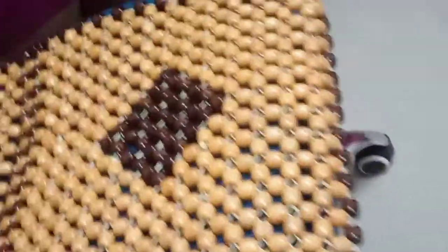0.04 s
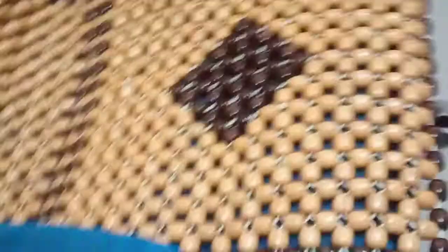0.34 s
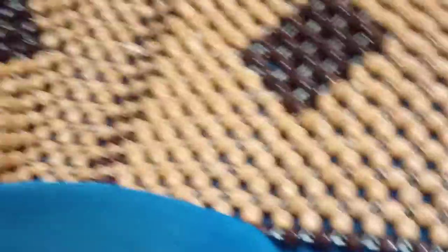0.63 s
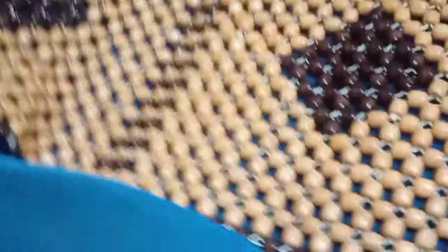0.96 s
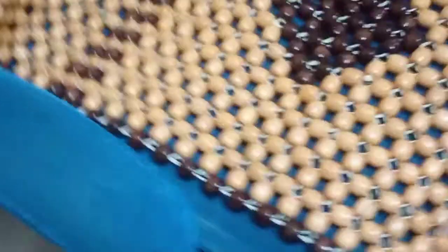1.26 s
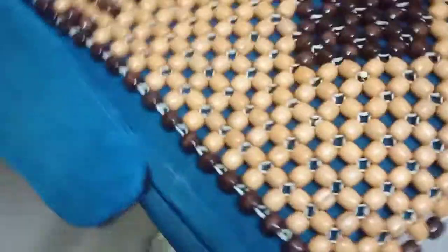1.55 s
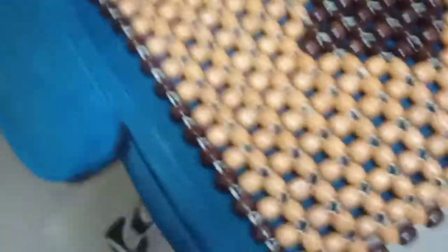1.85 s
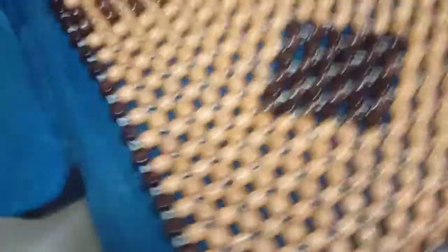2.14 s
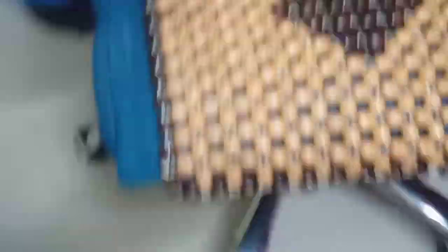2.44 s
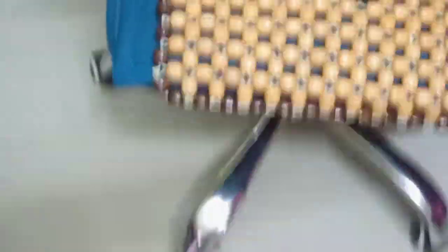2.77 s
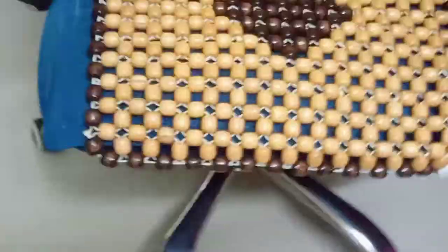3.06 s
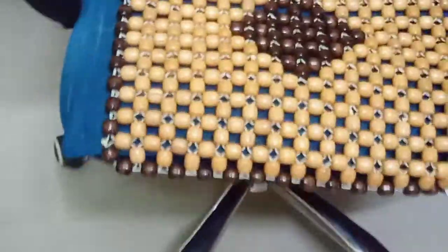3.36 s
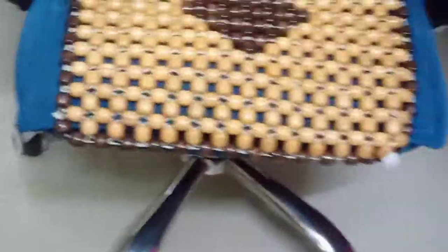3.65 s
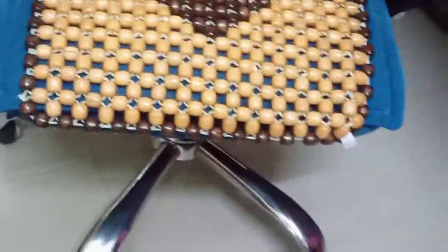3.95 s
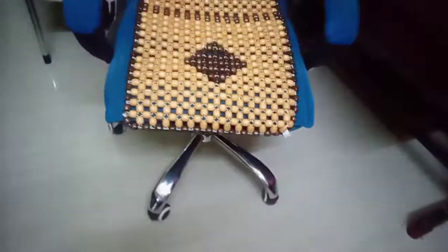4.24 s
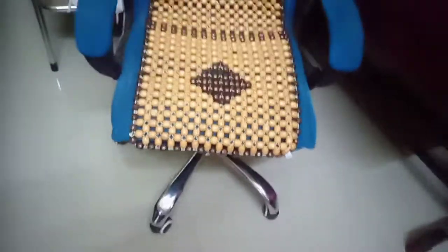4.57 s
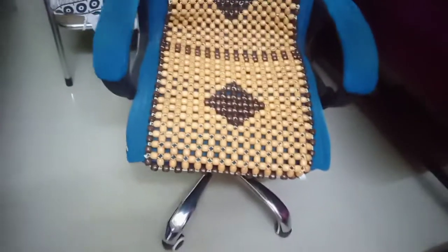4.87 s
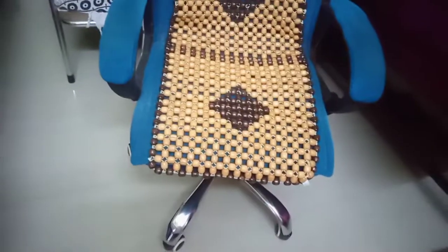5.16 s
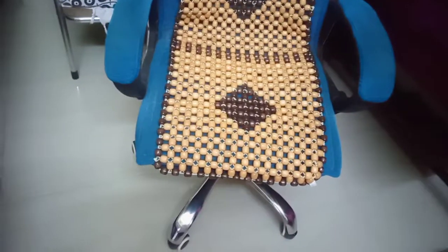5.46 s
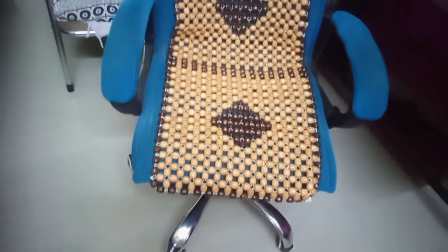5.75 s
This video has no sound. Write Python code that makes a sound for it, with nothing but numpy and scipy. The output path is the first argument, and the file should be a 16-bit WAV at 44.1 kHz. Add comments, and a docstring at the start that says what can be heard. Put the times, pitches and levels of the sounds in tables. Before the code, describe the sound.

A small camera is carried by hand around an office chair in a quiet room. Fingers drag and slide on its casing in short rustling strokes, with dull hollow knocks and a few faint bright ticks. The handling grows busier and louder toward the middle, then thins to occasional soft bumps. Everything is dry and right at the microphone, over a low rumble and steady hiss.

```python
"""A quiet room, where a small phone is carried by hand round an office chair with a wooden bead cover. The bed
is room hiss and the low rumble of the unsteady hand. Up close, fingers drag and slide on the casing in short
rustling strokes, the skin sticking and slipping. The grip knocks dully against the hollow shell, and now and
then a finger catches with a light, bright tick."""
import sys
import numpy as np
from scipy import signal
from scipy.fft import rfft, irfft
from scipy.io import wavfile
from scipy.ndimage import uniform_filter1d

SR = 44100
rng = np.random.default_rng(int(sys.argv[2]) if len(sys.argv) > 2 else 0)


def generate_wav(signal):
    """Clip the signal to [-1, 1] and save it as 16-bit WAV at the path in sys.argv[1]."""
    frames = np.transpose(np.atleast_2d(signal))
    scaled = np.clip(frames, -1, 1) * 32767
    pcm = np.round(scaled).astype(np.int16)
    wavfile.write(sys.argv[1], SR, pcm)


N = 256220
TIME = np.arange(N) / SR

# tone of the room's hiss: (frequency [Hz], relative level [dB])
HISS_EQ = [(40, 20.5), (250, 16), (500, 8), (1000, 5), (2000, 0), (3300, -0.5), (4000, -4.5), (4800, -11.5),
           (7000, -13), (10300, -14), (12000, -16.5), (16000, -16.5)]
# tone of the dark opening rush: (frequency [Hz], relative level [dB])
RUSH_EQ = [(40, -14), (100, 6.5), (240, 5), (420, -8), (850, -9), (1400, -14), (2200, -24.5), (3500, -36),
           (5000, -58), (16000, -64)]
# tone of the hand's tremor: (frequency [Hz], relative level [dB])
RUMBLE_EQ = [(20, -34.5), (35, -15), (52, -2.5), (76, 2), (108, -4), (150, -7.5), (220, -20.5), (400, -37),
             (800, -47), (2000, -75), (16000, -130)]
# unrest of the hand between shifts of the grip: (time [s], level [dB])
RUMBLE_FADER = [(0.0, -52.5), (0.32, -45.5), (0.53, -30.5), (0.68, -40), (1.63, -41.5), (1.84, -35.5),
                (2.22, -32), (2.36, -34), (2.85, -35.5), (2.99, -39), (3.77, -41.5), (4.04, -44.5),
                (4.37, -42.5), (4.81, -45.5), (4.97, -44.5), (5.81, -49.5)]
# finger strokes: (crest time [s], length [s], dull drag [dB], bright slide [dB], firmness [0-1])
STROKE_CUES = [(0.159, 0.044, -46, -71, 0.3), (0.373, 0.074, -44.5, -62, 0.47),
               (.411, 0.057, -39, -53, 0.95), (.437, 0.031, -31.5, -55, 1), (0.51, .04, -45.5, -62.5, 0.53),
               (0.582, 0.087, -34, -64.5, 0.66), (0.65, 0.058, -34.5, -67, .3),
               (.747, 0.03, -35.5, -85, 0.4), (0.892, 0.081, -46.5, -78, 0),
               (.983, 0.031, -38.5, -73, 0.58), (1.114, 0.041, -31.5, -63, 0.4),
               (1.19, 0.038, -48.5, -64, 0.36), (1.35, 0.052, -52, -67, 0.44), (1.584, 0.074, -49, -67, 0),
               (1.723, 0.046, -52, -54, .33), (1.795, 0.063, -34.5, -47.5, 0.73),
               (1.838, 0.053, -44.5, -53, 0.4), (1.917, 0.066, -37, -54.5, 0.4),
               (2.058, 0.087, -37, -53, 0.37), (2.129, 0.034, -45, -54, 0.2),
               (2.186, 0.11, -39.5, -51, 0.47), (2.28, 0.13, -34.5, -48.5, 0.42),
               (2.361, 0.038, -30.5, -51, 0.5), (2.403, 0.07, -27, -47.5, 0.58),
               (2.478, 0.089, -45, -63, 0.46), (2.519, 0.049, -31, -57, 0.57),
               (2.617, 0.068, -23, -54, .56), (2.672, .07, -37.5, -63.5, 0.15),
               (2.767, 0.054, -31.5, -65.5, .27), (2.85, 0.027, -44.5, -74, .05),
               (2.947, .037, -23.5, -74, 0.75), (2.973, 0.037, -39.5, -80, 0.4),
               (3.922, 0.052, -47, -76, .3), (4.223, 0.078, -43, -76, 0.3), (4.332, 0.067, -43.5, -83, .55),
               (4.456, 0.088, -43, -85, 0.5), (4.557, 0.032, -43.5, -86, 0.62),
               (5.134, 0.086, -51.5, -80, .47)]
# dull creep of a light finger: (frequency [Hz], relative level [dB])
CREEP_EQ = [(40, -14), (90, -27.5), (140, 6), (205, -1.5), (310, -5.5), (430, -10.5), (640, -18),
            (900, -21), (1300, -40), (3300, -48), (16000, -83)]
# dull drag of a firm finger: (frequency [Hz], relative level [dB])
DRAG_EQ = [(40, -27), (90, -11), (190, 3.5), (320, -8.5), (470, -14.5), (640, -16), (800, -22), (1000, -25),
           (1200, -25), (2000, -33), (3300, -37), (4800, -51), (9500, -51.5), (16000, -71)]
# light sizzle of gliding skin: (frequency [Hz], relative level [dB])
SIZZLE_EQ = [(500, -8), (900, 6.5), (1300, -6), (2400, -10), (3350, 1), (4100, -7.5), (5000, -23.5),
             (6500, -24), (8800, -16.5), (9700, 1), (10500, 0.5), (11500, -9.5), (12800, -14), (16000, -20)]
# broad scrape of skin under pressure: (frequency [Hz], relative level [dB])
SCRAPE_EQ = [(500, -9), (760, 14.5), (980, 18), (1250, -11.5), (2400, -11), (3400, 6.5), (4900, -7),
             (6400, 1.5), (7600, 4.5), (10300, 2.5), (12000, -16), (16000, -27)]
# knocks of the grip: (time [s], thud level [dB], thud pitch [Hz], tap level [dB], tap low-pass [Hz])
KNOCK_CUES = [(0.338, -25, 101, -31, 357), (.4, -19, 104.5, -33, 497), (.514, -28.5, 140, -11.5, 560),
              (1.012, -25, 75, -35, 300), (1.102, -26.5, 121, -34, 700), (1.112, -29, 129, -19, 710),
              (1.127, -29, 110, -27.5, 396), (1.206, -43, 110, -34, 1490), (1.55, -34, 87, -38, 1170),
              (1.606, -27, 97, -22.5, 1010), (1.706, -21, 95, -55, 300), (1.771, -20.5, 94, -20.5, 1050),
              (1.795, -17, 88, -21, 1010), (1.895, -13, 88, -16.5, 950), (2.01, -24, 101, -39, 1500),
              (2.029, -15.5, 101, -20.5, 1120), (2.037, -36, 97, -17.5, 1060), (2.065, -17, 126, -45, 400),
              (2.149, -23.5, 109, -30, 910), (2.281, -16.5, 119, -39, 630), (2.312, -18.5, 122, -28, 410),
              (2.357, -12.5, 144, -15.5, 600), (2.385, -10, 104.6, -14, 450), (2.529, -22, 105, -28, 400),
              (2.596, -5.5, 105.6, -22, 700), (2.612, -7.5, 123, -35, 700), (2.624, -4, 120, -10, 624),
              (2.71, -21.5, 105, -30, 380), (2.754, -19, 110, -20.5, 610), (2.784, -22.5, 77, -24, 443),
              (2.887, -13.5, 112.4, -28, 610), (2.938, -26.5, 129, -12.5, 540),
              (3.049, -17.5, 79.5, -61, 400), (3.233, -17, 106, -28.5, 358), (3.313, -27.5, 84, -41, 400),
              (3.397, -19, 88, -34.5, 420), (3.484, -24.5, 114, -35, 450), (3.91, -27.5, 103, -45, 500),
              (4.025, -24, 87, -34.5, 665), (4.221, -34, 97, -38, 905), (4.495, -25.5, 74.4, -48, 400),
              (4.549, -41, 99, -39.5, 700), (4.643, -28, 84, -54, 400), (5.105, -30, 119, -51, 400),
              (5.562, -32, 86, -58, 400)]
# ring of the tapped casing: (frequency [Hz], relative level [dB], 60 dB decay time [s])
CASING_MODES = [(177, 7.5, 0.017), (380, -4.5, 0.0078), (823, -12, 0.018), (993, -42, 0.013)]
# catches of a finger: (time [s], level [dB])
TICK_CUES = [(.3687, -62), (1.002, -56.5), (1.2044, -53.5), (1.567, -57), (1.5853, -52.5), (1.8964, -50.5),
             (2.0076, -53), (2.029, -53), (2.6313, -53), (3.047, -58.5), (3.549, -57.5)]
# tone of a tick: (frequency [Hz], relative level [dB])
TICK_EQ = [(500, -21), (1000, 10), (2200, 5), (3400, 5), (5000, -4), (7500, -9), (10300, 8.5), (12000, -5),
           (16000, -9)]

ATTACK_SHARE = 0.44   # part of a stroke or grip shift spent bearing down


def from_db(db):
    """Decibels to gain."""
    return 10 ** (np.asarray(db) / 20)


def unit_rms(x):
    """Normalise to unit power."""
    return x / np.sqrt(np.mean(x ** 2) + 1e-20)


def unit_peak(x):
    """Normalise to a peak of 1."""
    return x / np.abs(x).max()


def eq(x, curve):
    """Shape x with an EQ curve, rolling off below its first point; unit power."""
    hz, db = np.transpose(curve)
    bins = np.maximum(np.fft.rfftfreq(N, 1 / SR), 1)
    low_cut = np.minimum(bins / hz[0], 1) ** 2
    gain = from_db(np.interp(np.log(bins), np.log(hz), db))
    return unit_rms(irfft(rfft(x) * low_cut * gain, N))


def steady(x, window_s):
    """Level out slow swells and keep the fine grain."""
    size = max(int(window_s * SR), 2)
    power = uniform_filter1d(uniform_filter1d(x ** 2, size), size)
    return x / np.sqrt(power + 1e-6)


def friction(curve, per_s, spread_db, window_s):
    """Stick-slip texture: tiny random releases, a few much larger than the rest, EQ'd and levelled."""
    sizes = from_db(spread_db * np.minimum(rng.exponential(1, N), 4))
    signs = rng.choice([-1, 1], N)
    slips = unit_rms(sizes * signs * (rng.random(N) < per_s / SR))
    return steady(eq(slips, curve), window_s)


def ring(t, hz, t60):
    """One struck, decaying mode."""
    return np.sin(2 * np.pi * hz * t) * from_db(-60 * t / t60)


def butter(x, hz, kind, order=2):
    """Causal Butterworth filter."""
    return signal.sosfilt(signal.butter(order, hz, kind, fs=SR, output="sos"), x)


def add(out, start_s, sound):
    """Mix a sound in at its cue."""
    at = max(round(start_s * SR), 0)
    out[at:at + len(sound)] += sound[:max(N - at, 0)]


def pressure(length_s, release_power=1.37):
    """Envelope of a finger that bears down, peaks and eases off more softly."""
    t = np.arange(0, length_s, 1 / SR)
    phase = np.interp(t, [0, ATTACK_SHARE * length_s, length_s], [0, 1, 2])
    return np.abs(np.sin(np.pi / 2 * phase)) ** np.where(phase > 1, release_power, 1)


def room_tone(hiss_fade_db_per_s=0.24, rush_fade_db_per_s=27, rush_hold_s=0.13):
    """A bed of hiss sinks very slowly; a soft, darker rush dies away in the first second."""
    hiss_db = -58.5 - hiss_fade_db_per_s * TIME
    rush_db = -45.5 - rush_fade_db_per_s * np.maximum(TIME - rush_hold_s, 0)
    hiss = from_db(hiss_db) * eq(rng.standard_normal(N), HISS_EQ)
    rush = from_db(rush_db) * eq(rng.standard_normal(N), RUSH_EQ)
    return hiss + rush


def hand_rumble(shifts_per_s=8, shift_s=0.063, shift_db=6.5):
    """Tremor rumbles through the casing and swells with each small, unevenly timed shift of the grip."""
    rumble = friction(RUMBLE_EQ, per_s=1200, spread_db=3.0, window_s=0.13)
    fader_db = np.interp(TIME, *np.transpose(RUMBLE_FADER))
    swell_db = np.zeros(N)
    for k, (late, strength) in enumerate(rng.random(size=(80, 2))):
        add(swell_db, (k + late) / shifts_per_s, shift_db * (0.5 + strength) * pressure(shift_s))
    return from_db(fader_db + swell_db) * rumble


def finger_rubs(drag_power=0.64, slide_power=0.69):
    """Gripping skin judders dully, gliding skin sizzles; firmness crossfades them to drag and scrape."""
    creep, drag, sizzle, scrape = np.zeros((4, N))
    for crest_s, length_s, drag_db, slide_db, firmness in STROKE_CUES:
        start_s = crest_s - ATTACK_SHARE * length_s
        force = pressure(length_s)
        dull = from_db(drag_db) * force ** drag_power
        bright = from_db(slide_db) * force ** slide_power
        add(creep, start_s, np.sqrt(1 - firmness ** 2) * dull)
        add(drag, start_s, firmness * dull)
        add(sizzle, start_s, (1 - firmness) * bright)
        add(scrape, start_s, firmness * bright)
    return (creep * friction(CREEP_EQ, per_s=1500, spread_db=3.5, window_s=0.049)
            + drag * friction(DRAG_EQ, per_s=3000, spread_db=1.0, window_s=0.017)
            + sizzle * friction(SIZZLE_EQ, per_s=7400, spread_db=4.5, window_s=0.016)
            + scrape * friction(SCRAPE_EQ, per_s=9700, spread_db=2.0, window_s=0.013))


def grip_knocks(thud_t60=0.072):
    """The phone thuds in the hand and its hollow casing rings; a soft tap reaches only the low modes."""
    out, t = np.zeros(N), np.arange(SR // 5) / SR
    for start_s, thud_db, thud_hz, tap_db, tap_cutoff_hz in KNOCK_CUES:
        thud = butter(ring(t, thud_hz, thud_t60), 280, "low")
        thud = butter(thud, 50, "high")
        casing = sum(from_db(db + rng.normal(0, 1)) * ring(t, hz, t60) for hz, db, t60 in CASING_MODES)
        tap = butter(casing, tap_cutoff_hz, "low", order=6)
        tap = butter(tap, 100, "high", order=1)
        add(out, start_s, from_db(thud_db) * unit_peak(thud) + from_db(tap_db) * unit_peak(tap))
    return out


def finger_ticks(t60=0.028):
    """A finger catches briefly: a bright snap of noise that dies at once."""
    envelope, t = np.zeros(N), np.arange(SR // 20) / SR
    for start_s, db in TICK_CUES:
        add(envelope, start_s, from_db(db - 60 * t / t60))
    return envelope * steady(eq(rng.standard_normal(N), TICK_EQ), window_s=0.002)


def scene():
    """A dry mono mix: contact sounds reach the microphone directly, over the room tone."""
    return (finger_rubs() + grip_knocks() + finger_ticks() + hand_rumble() + room_tone())[None]


def record(dry, low_cut_hz=44.5, high_cut_hz=15600):
    """The microphone loses the deepest bass, and a steep filter takes off the very top."""
    thinned = butter(dry, low_cut_hz, "high", order=3)
    high_cut = signal.ellip(12, 0.1, 90, high_cut_hz, fs=SR, output="sos")
    return signal.sosfilt(high_cut, thinned)


dry = scene()
out = record(dry)
generate_wav(out)
```